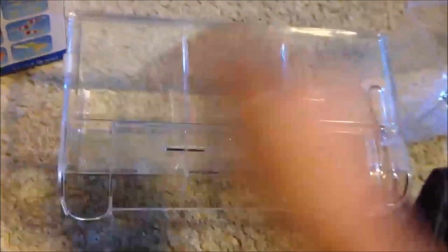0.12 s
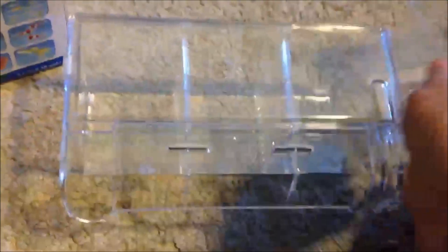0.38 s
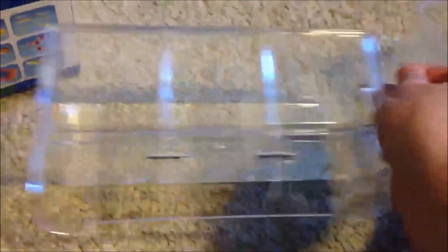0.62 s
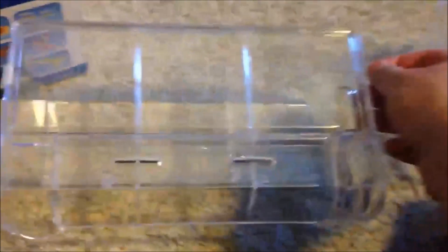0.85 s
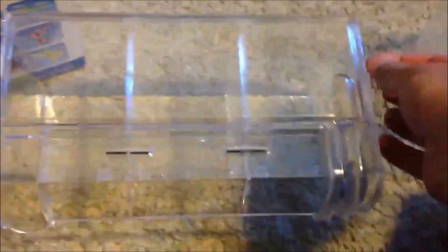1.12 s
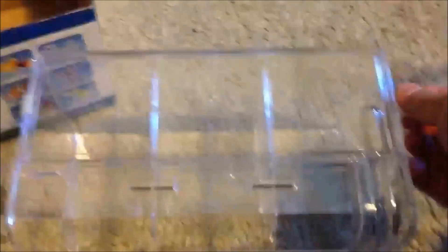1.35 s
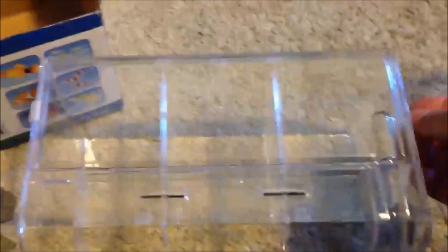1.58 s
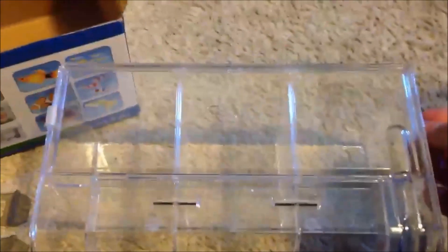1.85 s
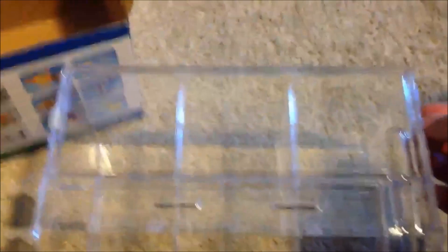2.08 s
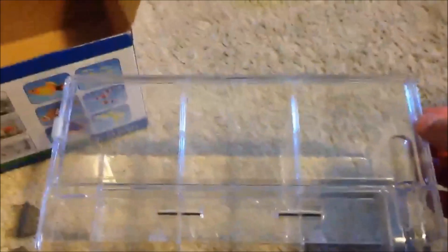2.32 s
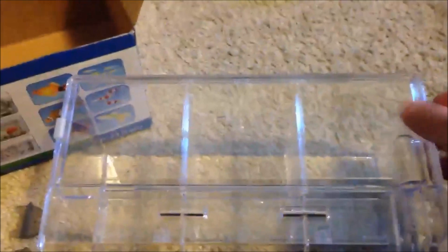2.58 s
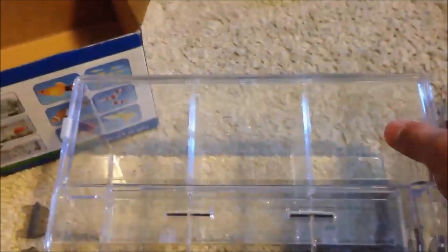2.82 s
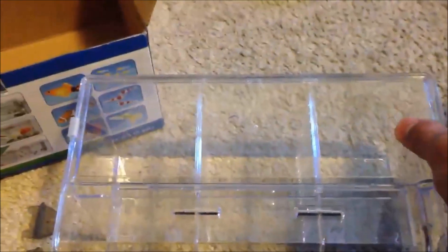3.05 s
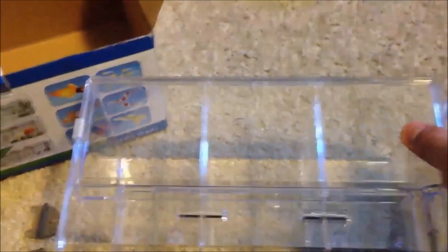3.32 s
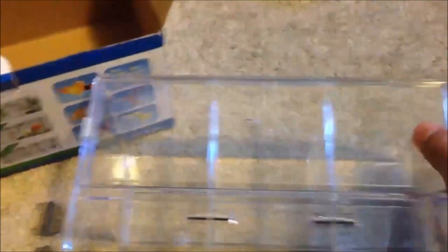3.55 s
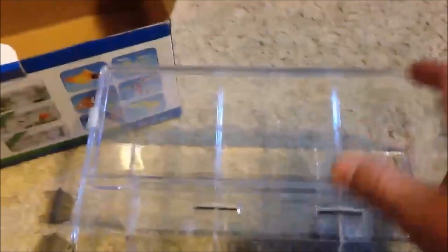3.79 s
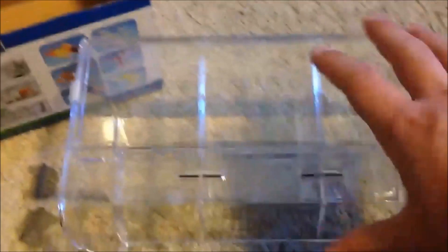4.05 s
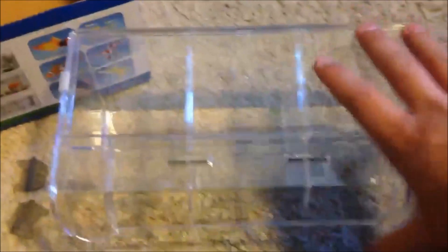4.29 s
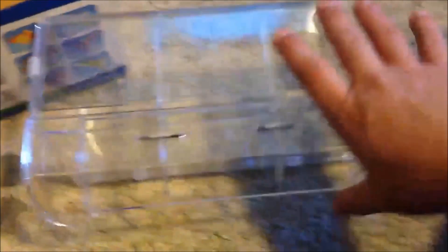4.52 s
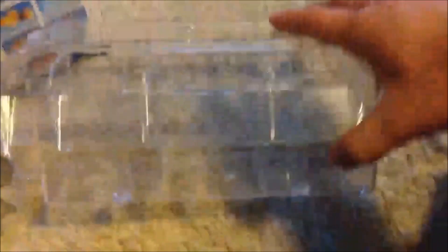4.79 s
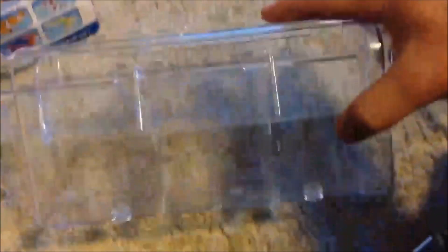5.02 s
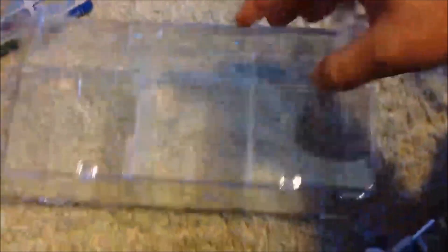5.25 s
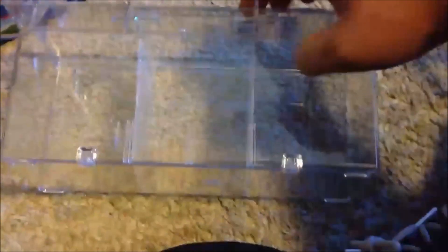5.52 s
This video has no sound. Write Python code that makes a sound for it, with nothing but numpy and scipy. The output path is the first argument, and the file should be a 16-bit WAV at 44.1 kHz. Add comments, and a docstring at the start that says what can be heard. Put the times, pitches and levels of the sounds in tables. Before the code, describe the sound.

Close microphone in a small carpeted room with a steady low electrical hum and faint air hiss. Hands handle a hollow clear plastic box: soft knocks, a brief lid rattle and sleeve rustle, then a crisp small click after two seconds. At three seconds the latch snaps very loudly in a quick cluster. Afterwards come faint dull fingertip bumps, skin brushing on plastic and small creaky ticks.

```python
"""The latch of a clear plastic box, turned and pressed on a carpet, catches, snaps home and rebounds.
Hard edges crack as bursts of band-passed noise that excite the wall modes; fingertips knock the hollow
body softly and a loose lid rattles, both as sums of decaying modes. Sleeve and skin rustle as shaped
noise, an appliance hums in mains harmonics, and room air hisses as noise. A close microphone's gain
control ducks after loud sounds and creeps back."""
import sys
import numpy as np
from scipy import signal
from scipy.fft import rfft, irfft
from scipy.io import wavfile
from scipy.ndimage import uniform_filter1d

SR = 44100
rng = np.random.default_rng(int(sys.argv[2]) if len(sys.argv) > 2 else 0)


def amp(db):
    return 10 ** (np.asarray(db, float) / 20)


def waveform_to_disk(signal):
    """Save audio, clipped to [-1, 1], as 16-bit WAV at the path in sys.argv[1]."""
    frames = np.transpose(np.atleast_2d(signal))
    scaled = np.clip(frames, -1, 1) * 32767
    samples = np.round(scaled).astype(np.int16)
    wavfile.write(sys.argv[1], SR, samples)


N = 248327  # samples

# blows of the latch: (t/s, level/dB, chatter length/s, band centre f/Hz)
LATCH_BLOWS = [(3.012, -16.5, 0.017, 3430), (3.0475, 0.5, .012, 4600), (3.0695, -1.5, 0.013, 5300)]
# flap behind the hook: (f/Hz, spread/octave, level/dB relative to the hook, length/hook length)
LATCH_FLAP = (1505.5, 0.9, -11, 1.6)
HOOK_SPREAD = 0.86  # octaves either side of the band centre
# cracks of hard edges: (t/s, level/dB, band centre f/Hz, chatter length/s, spread/octave)
EDGE_CRACKS = [(0.4018, -35, 5950, 0.0097, 1.3), (0.418, -38.5, 5100, 0.032, 0.8),
               (0.499, -44, 4170, 0.011, 0.72), (0.527, -45, 6100, 0.0073, 1.4),
               (1.725, -44.5, 3200, 0.024, 1.5), (2.2667, -37, 6000, 0.02, 1.5),
               (2.2728, -22.5, 5400, 0.0082, 0.95), (2.28, -31.5, 4450, 0.02, 1.2),
               (3.353, -47, 2680, 0.016, .5), (3.397, -44, 3930, 0.034, 0.81),
               (4.57, -44.5, 1500, 0.052, 1.3), (4.595, -42, 7000, 0.01, 0.24),
               (4.878, -38, 6300, 0.038, 0.41), (4.894, -38, 3970, 0.025, 0.17),
               (5.025, -51, 3900, 0.0089, 0.28), (5.237, -43, 4300, 0.067, 0.99),
               (5.352, -45.5, 4140, 0.016, 0.9), (5.602, -44.5, 3420, 0.065, 1.05)]
FLECKS_PER_S, FLECK_DB = 16, -53  # rate and lowest level of the faint narrow-band ticks
# modes of the stiff walls: (f/Hz, relative level/dB, t60/s)
WALL_MODES = [(850, -6, .05), (1500, -10, .035), (2150, -7, .03), (2500, -5, .03), (2940, -7, .03),
              (3630, -4, .03), (3790, -7, .03), (4220, -5, .03), (4420, -4, .03), (4550, -2, .03),
              (4830, -5, .03), (5350, -2, .03), (5580, -3, .03), (5830, -4, .03), (6340, -2, .025),
              (6660, -4, .025), (7080, -3, .025), (7350, -4, .025), (7650, -5, .025), (8400, -9, .025)]

# knocks on the hollow body: blunt fingertip pushes, and the latch's blows at 3.01-3.07 s: (t/s, peak level/dB,
# favoured mode f/Hz, skid/s)
BODY_KNOCKS = [(.06, -51.5, 560, 0.098), (0.151, -47, 420, 0.031), (.31, -46.5, 520, 0.057),
               (2.09, -50.5, 624, 0.038), (3.0117, -26, 417, .0005), (3.021, -15.5, 293, 0.00036),
               (3.05, -5, 338, .0005), (3.072, -20, 396, .0005), (3.399, -53, 407, 0.0077),
               (3.618, -40.5, 293, 0.0091), (3.669, -40.5, 295, 0.011), (4.312, -34.5, 252, 0.01),
               (4.332, -46, 620, 0.012), (4.355, -40, 280, .01), (4.361, -49.5, 520, .05),
               (4.413, -45, 278, .008), (4.573, -37.5, 343, 0.013), (4.612, -43.5, 724, .004),
               (4.76, -39.5, 283, 0.019), (4.795, -39.5, 285, 0.018), (5.246, -39.5, 297, 0.025),
               (5.285, -44, 390, 0.013), (5.479, -41, 292, .01), (5.541, -40.5, 295, 0.011)]
NUDGES_PER_S, NUDGE_DB = 4, -57  # rate and lowest level of the faint pushes
# modes of the hollow body: (f/Hz, relative level/dB, t60/s)
HOLLOW_MODES = [(200, -6, .11), (283, 0, .075), (340, -6, .06), (400, -3, .11), (530, -9, .09),
                (620, -10, .08), (850, -11, .09)]

# rattles of the loose lid: (t/s, peak level/dB, length/s)
LID_RATTLES = [(0.4004, -29.5, 0.028), (0.427, -38, 0.0089), (0.435, -30, 0.02), (0.458, -38.5, 0.011),
               (5.242, -42.5, 0.045)]
# modes of the lid: (f/Hz, relative level/dB, t60/s)
LID_MODES = [(550, -11, .07), (1200, -10, .035), (1287, 0, .05), (1345, -3, .05), (1890, -3, .035),
             (2256, -6, .045), (2430, -3, .055)]

# one dry tick at the microphone: (t/s, peak level/dB, f/Hz, width/s)
CASING_TICK = (4.4712, -33, 1200, .00027)
# reverberation time of the room: (f/Hz, t60/s)
ROOM_T60 = [(200, .17), (800, .22), (2000, .21), (5000, .22), (10000, .19)]

# arm sweeps: (t/s of greatest speed, rise/s, fall/s, cloth-on-carpet level/dB, skin-on-plastic level/dB)
ARM_SWEEPS = [(.14, 0.092, 0.11, -50, -54.5), (.54, 0.16, 0.031, -55, -60), (.7, 0.17, 0.2, -68, -53.5),
              (.89, .14, 0.13, -49, -58), (2.38, 0.19, 0.21, -70, -58.5), (3.3, 0.59, 0.26, -64, -69),
              (4.14, 0.23, 0.16, -49, -52), (4.59, 0.038, 0.16, -52, -54.5), (4.8, 0.23, .1, -58.5, -50),
              (5.12, 0.3, 0.25, -67.5, -56), (5.3, 0.21, 0.16, -63, -62)]
SWEEP_EDGE_DB = -10  # relative level one rise or fall time away from the fastest moment
REST_CLOTH_DB, REST_SKIN_DB = -74.5, -61  # the hand never lies quite still
# spectrum of cloth on carpet: (f/Hz, relative level/dB per Hz)
CLOTH_SPECTRUM = [(200, -21.5), (500, -7.5), (900, -5.5), (1300, 3), (2300, 3), (3500, -3.5), (5000, -12.5),
                  (9000, -29)]
# spectrum of skin on plastic: (f/Hz, relative level/dB per Hz)
SKIN_SPECTRUM = [(1000, -26), (2500, 2), (4000, 3.5), (4700, 3), (5200, -4), (7500, 1.5), (9000, -8.5),
                 (10500, -33)]

MAINS_HZ = 60.005
# hum partials: (multiple of the mains frequency, rms level/dB, wavering/dB)
HUM_PARTIALS = [(2, -55, .15), (3, -61.5, 1.2), (4, -47.5, .5), (5, -62.5, 1.5), (6, -69.5, 1.5),
                (7, -78.5, 1), (10, -80, 2), (14, -81, 2), (18, -75, 1.5), (20, -81, 2)]
# spectrum of the room air: (f/Hz, relative level/dB per Hz)
AIR_SPECTRUM = [(18, -82), (30, -76.5), (64, -41), (78, -39), (97, -17), (184, -14), (241, -0.5),
                (286, -11), (541, -19), (1080, -17.5), (1850, -22), (3240, -19.5), (8030, -25.5),
                (9540, -50), (10500, -65.5), (13700, -109), (22000, -120)]
ROOM_AIR_DB = -57  # rms
CEILING = .82  # saturation level of the input stage, as a share of full scale


def evened(x):
    """Normalisation to unit rms."""
    return x / np.sqrt(np.mean(x ** 2) + 1e-20)


def read(points, hz):
    """Linear interpolation of a table on a logarithmic frequency axis."""
    f, value = np.transpose(points)
    return np.interp(np.log(hz + 1), np.log(f + 1), value)


def add(mix, s, sound):
    """Superposition of a sound on the mix from time s onward."""
    part = mix[round(s * SR):][:len(sound)]
    part += sound[:len(part)]


def ring(modes):
    """Impulse response as a sum of exponentially decaying modes, peak 1."""
    t = np.arange(SR // 6) / SR
    out = sum(amp(db - 60 * t / t60) * np.sin(2 * np.pi * hz * t) for hz, db, t60 in modes)
    return out / abs(out).max()


def hiss(spectrum, patchy_db, flicker_db):
    """Gaussian noise of unit rms, its short-time spectrum modulated by drifting patches and a flicker."""
    frames = N // 256 + 5
    hz = np.fft.rfftfreq(1024, 1 / SR)
    real, imaginary, patches = rng.standard_normal((frames, 513, 3)).T
    patches = uniform_filter1d(patches, size=14, axis=0)  # along frequency
    patches = evened(uniform_filter1d(patches, size=10, axis=1))  # along time
    flicker = evened(uniform_filter1d(rng.standard_normal(frames), size=3))  # common to all frequencies
    level_db = read(spectrum, hz)[:, None] + patchy_db * patches + flicker_db * flicker
    z = (real + 1j * imaginary) * amp(level_db)
    return evened(signal.istft(z, nperseg=1024, noverlap=768)[1][:N])


def latch():
    """Paired excitation: each blow is a bright hook and a duller, longer flap, as rows like the cracks."""
    flap_hz, flap_spread, under_db, longer = LATCH_FLAP
    hook = [(s, db, hz, length, HOOK_SPREAD) for s, db, length, hz in LATCH_BLOWS]
    flap = [(s, db + under_db, flap_hz, longer * length, flap_spread) for s, db, length, hz in LATCH_BLOWS]
    return hook + flap


def flecks():
    """Uniformly random times: faint, short, narrow-band ticks in the background, as rows like the cracks."""
    count = round(FLECKS_PER_S * N / SR)
    when, size, pitch, length = rng.random((count, 4)).T
    level_db = FLECK_DB + 4 * size
    hz = 2400 * 3.3 ** pitch
    return list(zip(when * N / SR, level_db, hz, .006 + .025 * length, .14 + .15 * size))


def cracks(ring_db=-11):
    """Stick-slip excitation: a chatter of tiny slips radiates directly and drives the wall modes."""
    out, size = np.zeros(N), 8192
    t = np.arange(size) / SR
    walls = ring(WALL_MODES)
    body = 1 + amp(ring_db) * rfft(walls / np.linalg.norm(walls), size)  # direct sound plus ringing
    dull_top = signal.butter(4, 8000, fs=SR, output="sos")  # the highest treble rolls off above 8 kHz
    for s, db, hz, length, spread in EDGE_CRACKS + latch() + flecks():
        slips = rng.standard_normal(size) * np.exp(.5 * rng.standard_normal(size))  # uneven sizes
        # abrupt start, then the chatter dies away
        slips *= np.exp(-(t / length) ** 2.08) * np.minimum(t / 0.00053, 1)
        width = np.clip(2 ** spread, 1.1, 8)
        band = signal.butter(2, [hz / width, min(hz * width, 18000)], "band", fs=SR, output="sos")
        slips = signal.sosfilt(band, signal.sosfilt(dull_top, slips))
        sound = irfft(rfft(slips) * body)[:size]
        loudest_rms = np.sqrt(uniform_filter1d(sound ** 2, size=130).max())
        add(out, s, amp(db) * sound / loudest_rms / 1.79)  # the loudest 3 ms has rms amp(db) / 1.79
    return out


def nudges():
    """Uniformly random times: faint pushes, as rows like the knocks."""
    count = round(NUDGES_PER_S * N / SR)
    when, size, pitch, skid = rng.random((count, 4)).T
    return list(zip(when * N / SR, NUDGE_DB + 5 * size, 280 * 2.5 ** pitch, .01 + .04 * skid))


def knocks(reach=0.24):
    """Modal excitation by place: a fingertip, or a blow of the latch, favours the modes that move where it
    lands and skids."""
    out, t = np.zeros(N), np.arange(8192) / SR
    for s, db, hz_spot, skid_s in BODY_KNOCKS + nudges():
        # a mode reach octaves away from the favoured one loses 6 dB
        near = [(hz, level - 6 * (np.log2(hz / hz_spot) / reach) ** 2, t60)
                for hz, level, t60 in HOLLOW_MODES]
        landing = np.exp(-(t / .0005) ** 2)
        judder = rng.standard_normal(8192) * np.minimum(t / .002, 1)  # skin on plastic
        skid = (landing + judder) * np.exp(-(t / skid_s) ** 2)
        softened = signal.fftconvolve(ring(near), np.hanning(41))  # soft contact
        sound = signal.fftconvolve(softened, skid)
        add(out, s, amp(db) * sound / abs(sound).max())
    return out


def rattles():
    """Modal response to repeated impact: a short chatter of bounces drives the lid's modes."""
    out, lid, t = np.zeros(N), ring(LID_MODES), np.arange(4096) / SR
    for s, db, length in LID_RATTLES:
        bounces = rng.standard_normal(4096) * np.exp(-(t / length) ** 4.5)
        sound = signal.fftconvolve(bounces, lid)
        add(out, s, amp(db) * sound / abs(sound).max())
    return out


def casing_tick():
    """Heavily damped oscillation: one cosine under a Gaussian envelope, without reverberation."""
    s, db, hz, width = CASING_TICK
    t = np.arange(N) / SR - s
    return amp(db) * np.exp(-(t / width) ** 2 / 2) * np.cos(2 * np.pi * hz * t)


def room(x):
    """Diffuse reverberation: sparse reflections of random sign, each band decaying at its own rate."""
    taps = np.zeros(SR // 2)
    at = np.arange(200, SR // 2 - 20, 20)
    taps[at + rng.integers(0, 20, len(at))] = rng.choice([-1., 1.], len(at))
    hz, t, z = signal.stft(taps, SR, nperseg=256)
    decay = amp(-60 * t / read(ROOM_T60, hz)[:, None])
    tail = signal.istft(z * decay, SR, nperseg=256)[1]
    return signal.fftconvolve(x, tail / np.linalg.norm(tail))[:N]


def rustle():
    """Friction noise: dull cloth and bright skin add power as each sweep of the arm swells and fades."""
    t = np.arange(N) / SR
    cloth, skin = amp(REST_CLOTH_DB) ** 2, amp(REST_SKIN_DB) ** 2  # powers
    for s, rise, fall, cloth_db, skin_db in ARM_SWEEPS:
        swell_db = SWEEP_EDGE_DB * ((t - s) / np.where(t < s, rise, fall)) ** 2
        swell_db = np.maximum(swell_db, -90)
        cloth = cloth + amp(cloth_db + swell_db) ** 2
        skin = skin + amp(skin_db + swell_db) ** 2
    cloth_noise = np.sqrt(cloth) * hiss(CLOTH_SPECTRUM, patchy_db=0.2, flicker_db=0.5)
    skin_noise = np.sqrt(skin) * hiss(SKIN_SPECTRUM, patchy_db=2.5, flicker_db=1.5)
    return cloth_noise + skin_noise


def hum():
    """Harmonic series of the mains: phase-locked partials, each wavering slowly in level."""
    turn = 2 * np.pi * MAINS_HZ * np.arange(N) / SR - 1.85  # phase of the mains cycle, rad
    out = np.zeros(N)
    for k, db, waver_db in HUM_PARTIALS:
        drift = evened(uniform_filter1d(rng.standard_normal(N // 441 + 2), size=12))  # 10 ms steps
        drift = np.interp(np.arange(N) / 441, np.arange(len(drift)), drift)
        out += np.sqrt(2) * amp(db + waver_db * drift) * np.cos(k * turn - .5)
    return out


def room_air():
    """Stationary background: broadband noise with the spectrum of the room air."""
    return amp(ROOM_AIR_DB) * hiss(AIR_SPECTRUM, patchy_db=2.0, flicker_db=-0.5)


def scene():
    """Superposition: the box and its reverberation over rustle, hum and room air."""
    small_box = signal.butter(5, 180, "high", fs=SR, output="sos")  # too small to radiate deep bass
    box = signal.sosfilt(small_box, cracks() + knocks() + rattles())
    background = rustle() + hum() + room_air()
    return (box + amp(-13) * room(box) + casing_tick() + background)[None]


def band_limit(x):
    """A steep low-pass at the top of the band."""
    return signal.sosfilt(signal.butter(12, 10670, fs=SR, output="sos"), x)


def record(dry):
    """Dynamic compression: gain falls soon after a loud sound and recovers slowly; peaks saturate."""
    power_db = 10 * np.log10(abs(uniform_filter1d(dry[0] ** 2, size=400)) + 1e-12)
    duck_db = 0.13 * np.maximum(power_db + 39.0, 0)  # 0.13 dB for each dB above -39 dB
    creep = np.arange(N) * 1.93 / SR  # recovery at 1.93 dB/s
    duck_db = np.maximum.accumulate(duck_db + creep) - creep
    duck_db = uniform_filter1d(duck_db, size=2000, origin=999)  # mean of the preceding 45 ms
    limited = CEILING * np.tanh(dry / amp(duck_db) / CEILING)  # the input stage rounds the highest peaks
    lowpass = signal.firwin(255, 10100, window=("kaiser", 8), fs=SR)
    mix = signal.oaconvolve(limited, lowpass[None], "same")
    return band_limit(mix)


dry = scene()
out = record(dry)
waveform_to_disk(out)
```